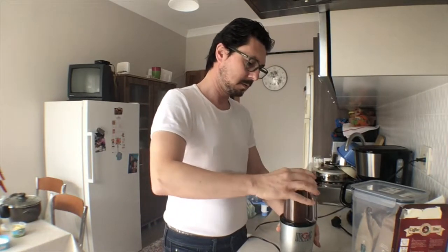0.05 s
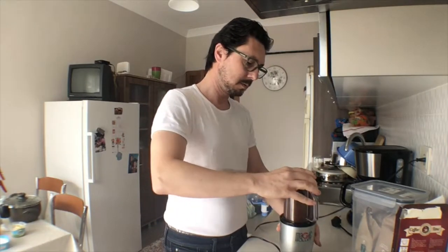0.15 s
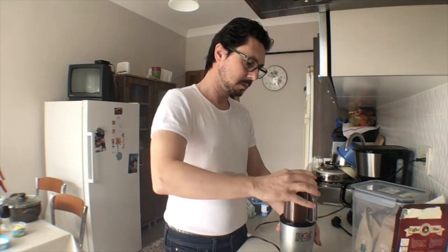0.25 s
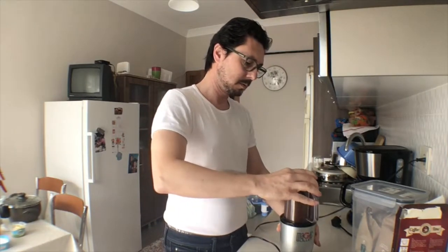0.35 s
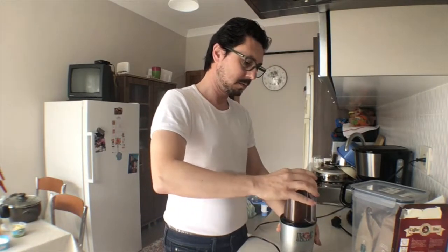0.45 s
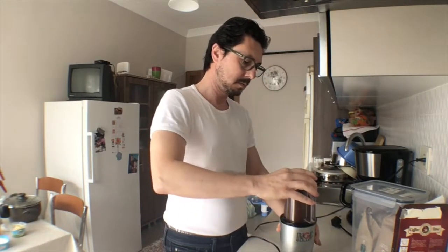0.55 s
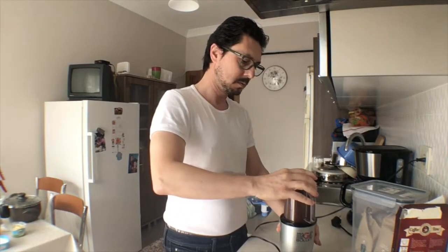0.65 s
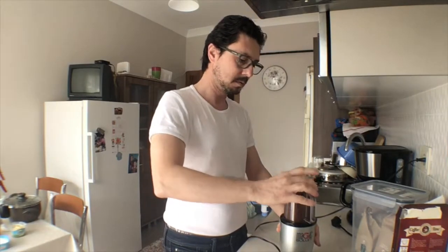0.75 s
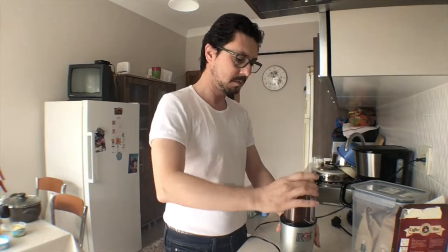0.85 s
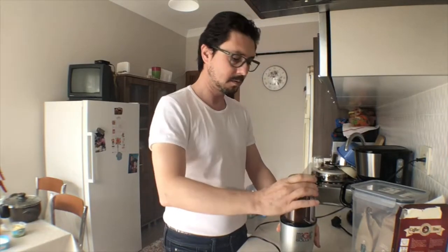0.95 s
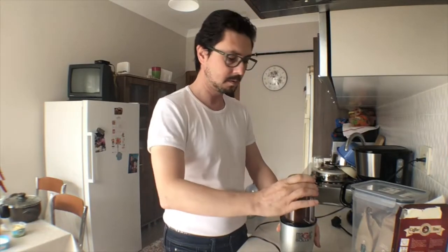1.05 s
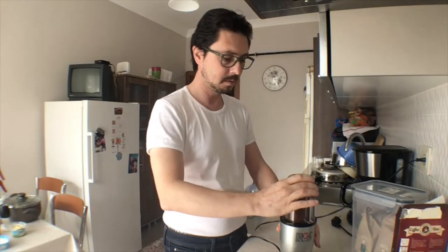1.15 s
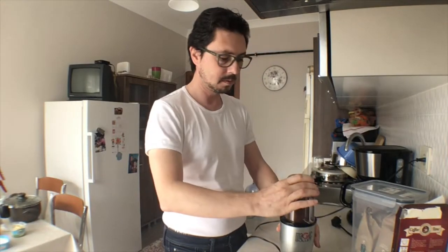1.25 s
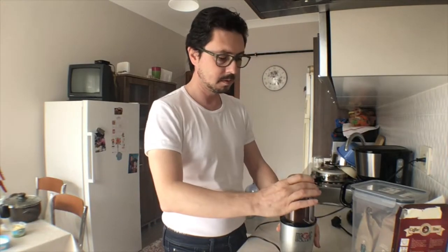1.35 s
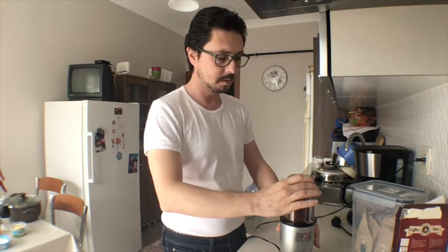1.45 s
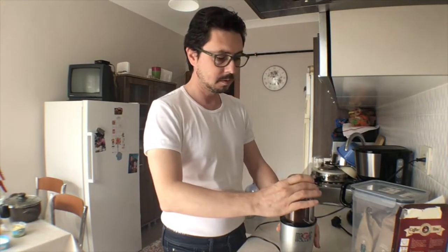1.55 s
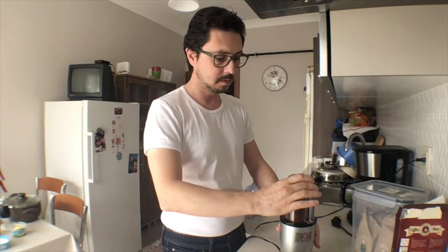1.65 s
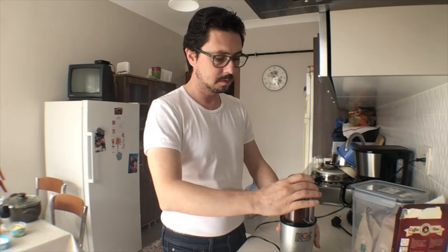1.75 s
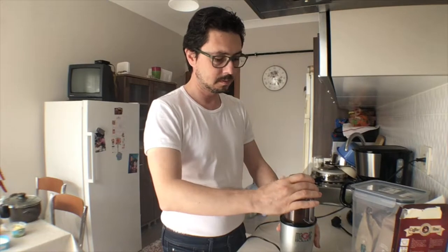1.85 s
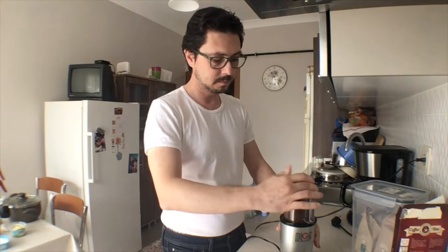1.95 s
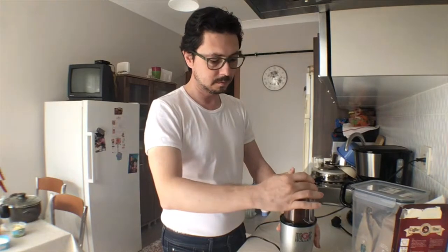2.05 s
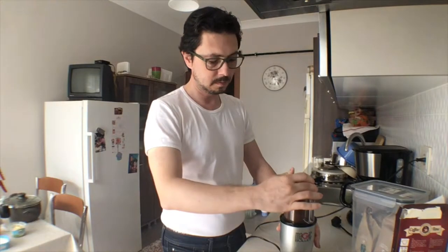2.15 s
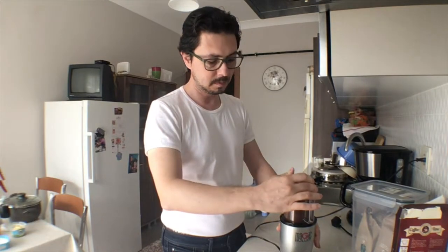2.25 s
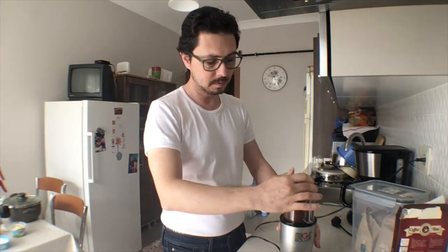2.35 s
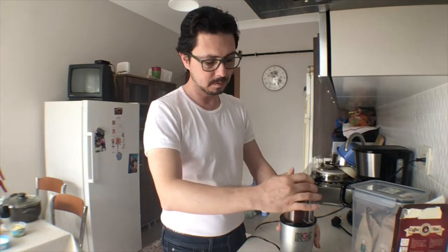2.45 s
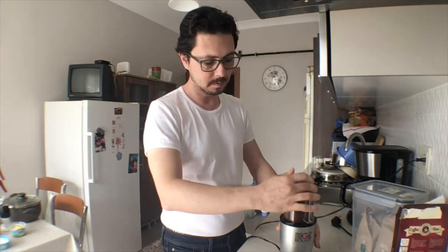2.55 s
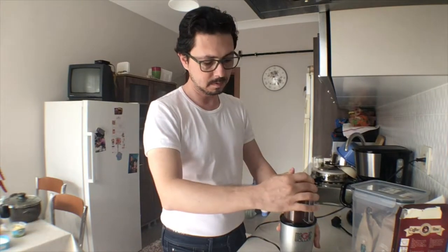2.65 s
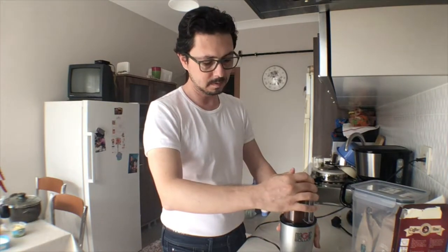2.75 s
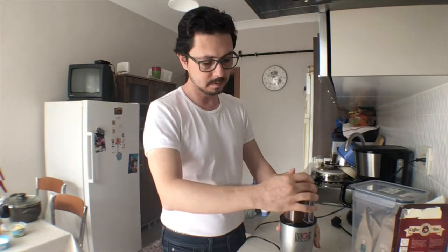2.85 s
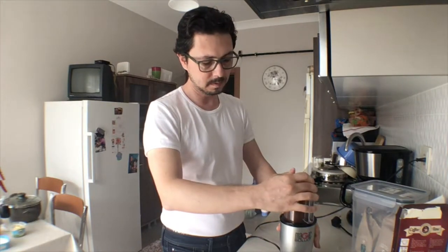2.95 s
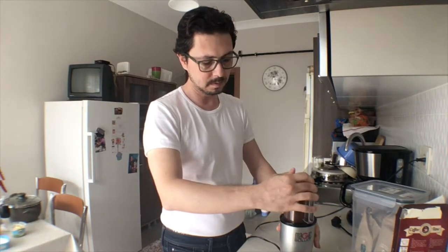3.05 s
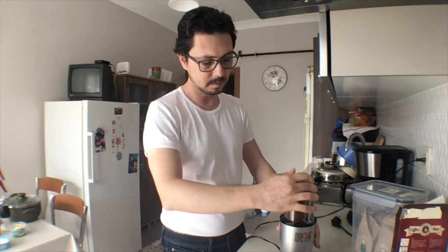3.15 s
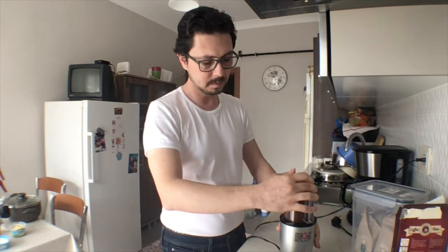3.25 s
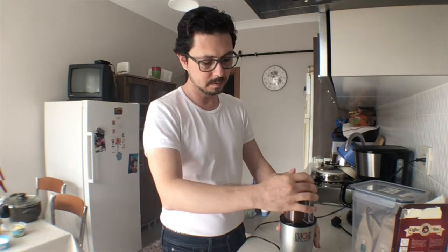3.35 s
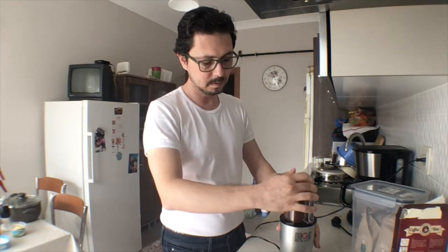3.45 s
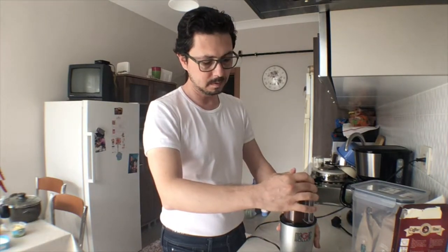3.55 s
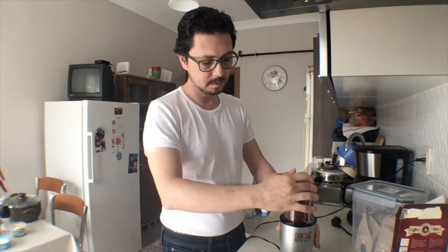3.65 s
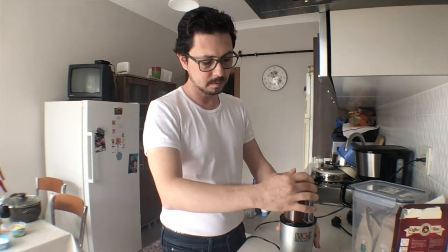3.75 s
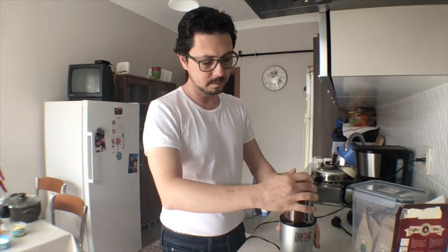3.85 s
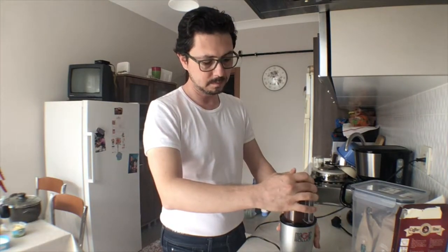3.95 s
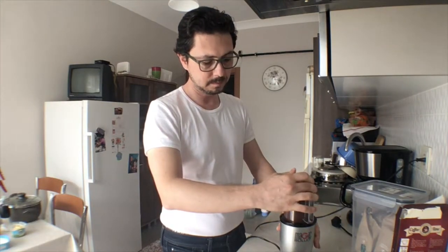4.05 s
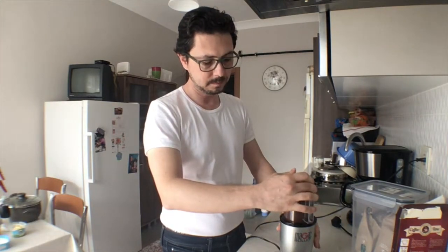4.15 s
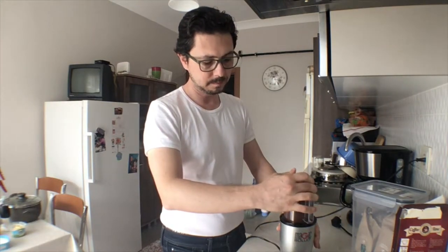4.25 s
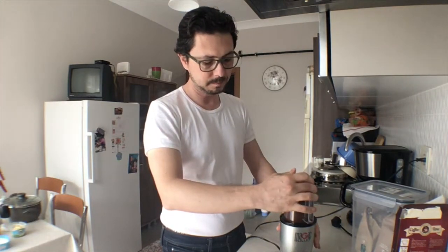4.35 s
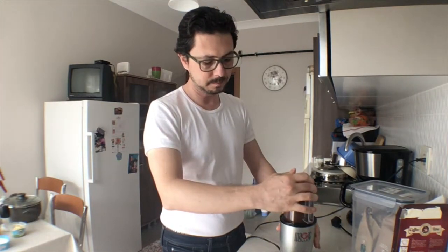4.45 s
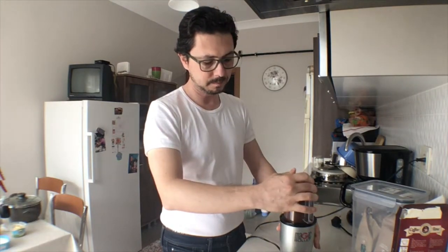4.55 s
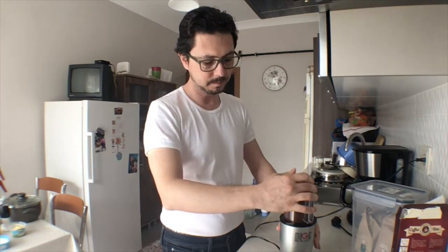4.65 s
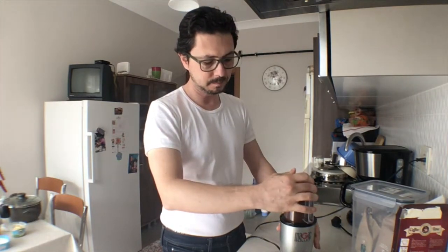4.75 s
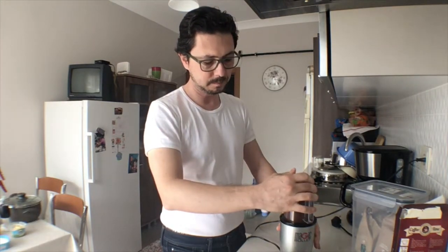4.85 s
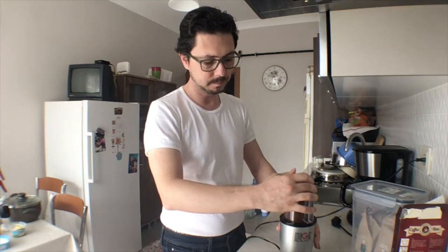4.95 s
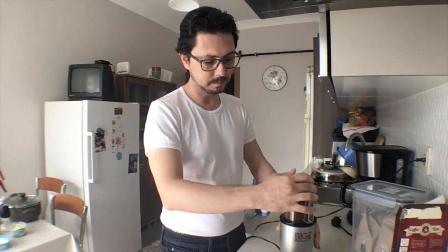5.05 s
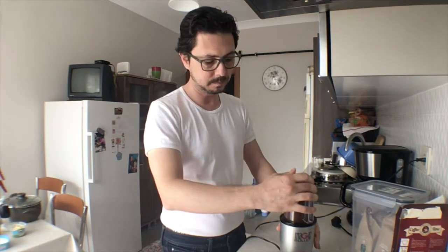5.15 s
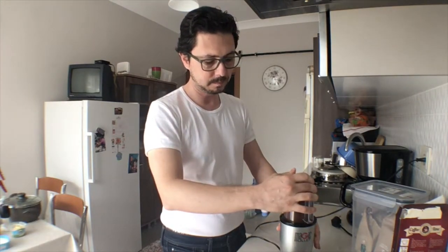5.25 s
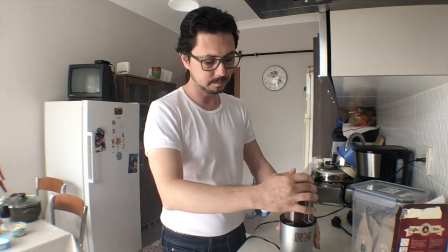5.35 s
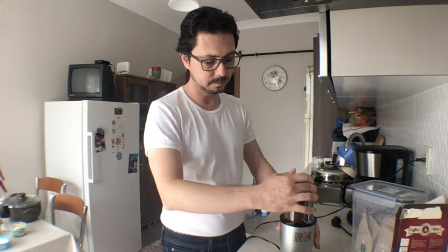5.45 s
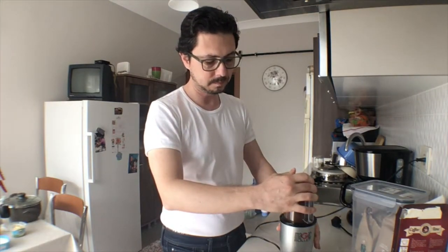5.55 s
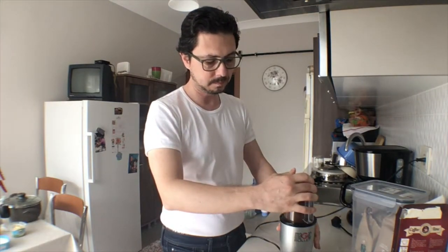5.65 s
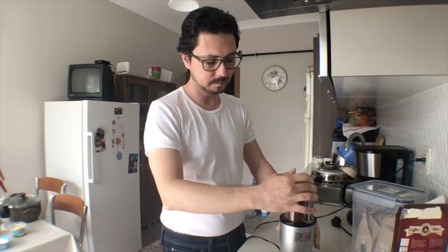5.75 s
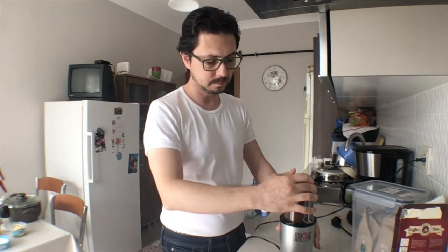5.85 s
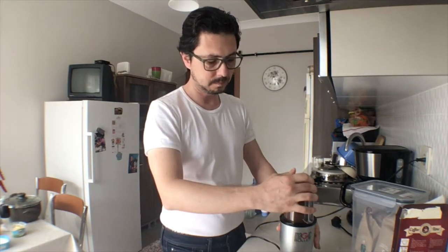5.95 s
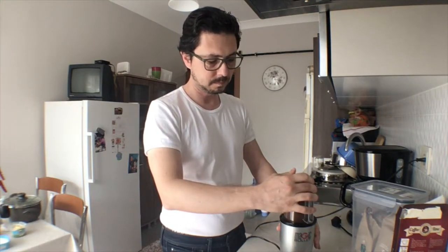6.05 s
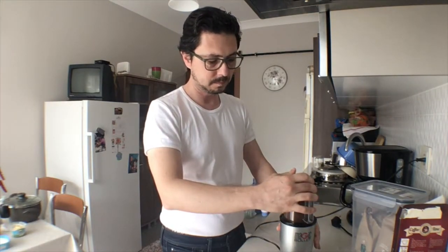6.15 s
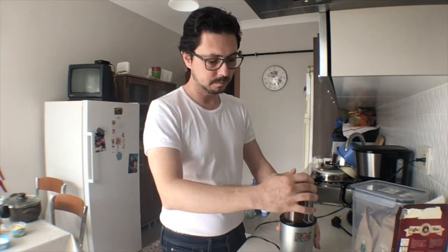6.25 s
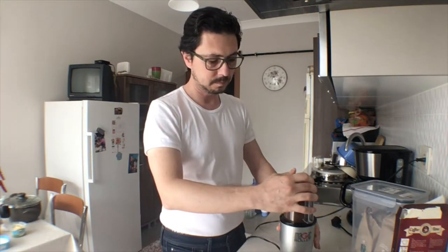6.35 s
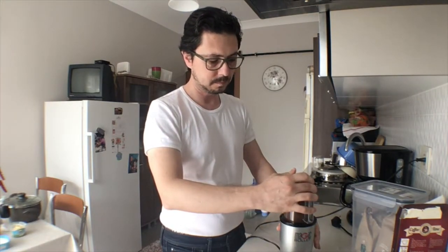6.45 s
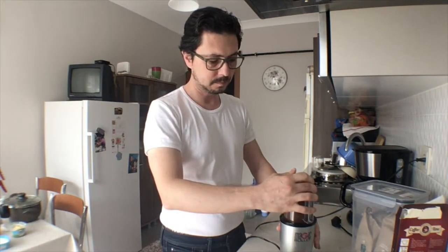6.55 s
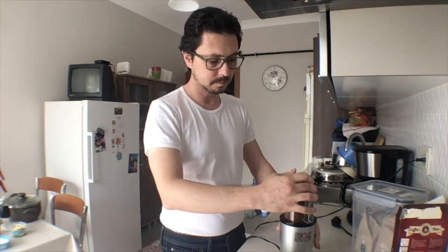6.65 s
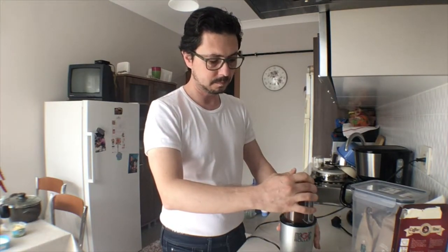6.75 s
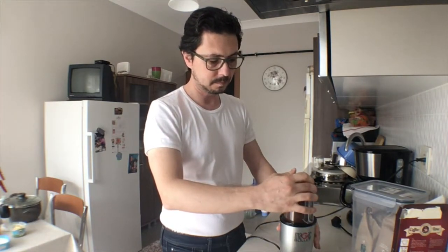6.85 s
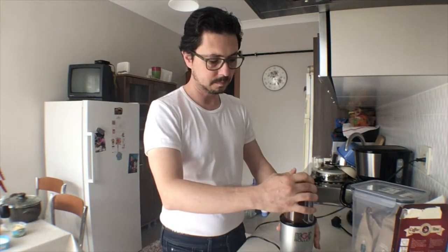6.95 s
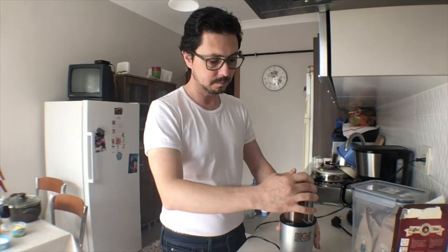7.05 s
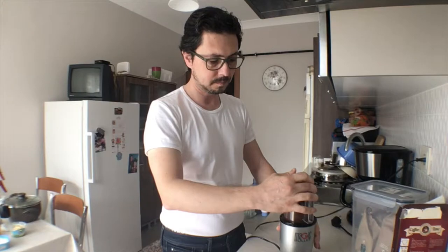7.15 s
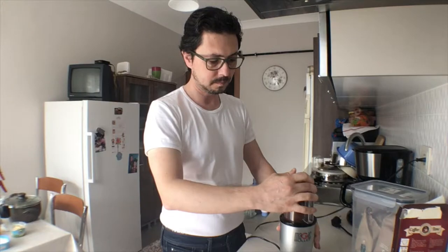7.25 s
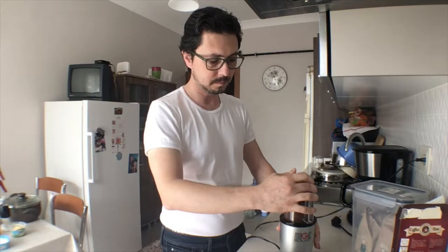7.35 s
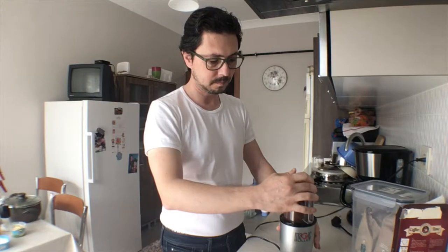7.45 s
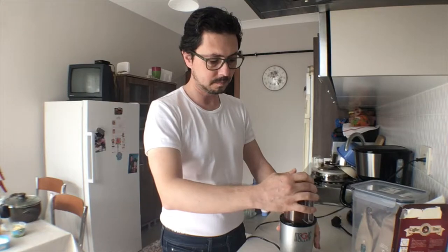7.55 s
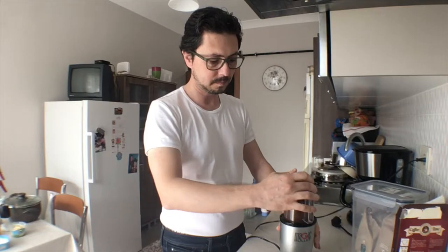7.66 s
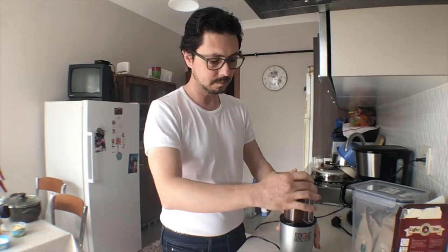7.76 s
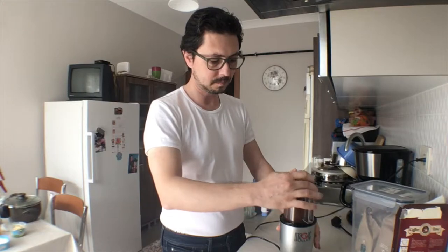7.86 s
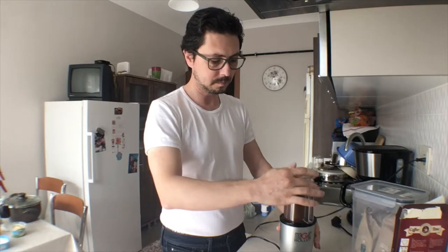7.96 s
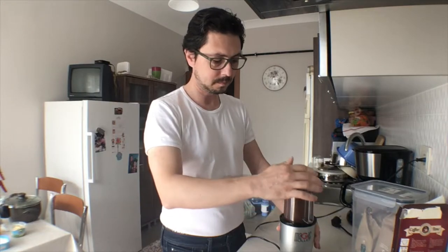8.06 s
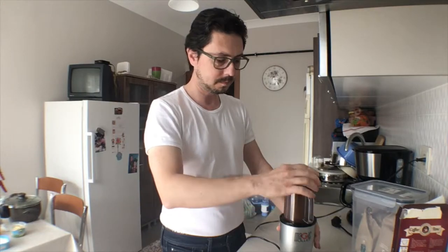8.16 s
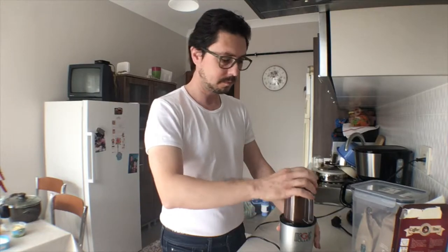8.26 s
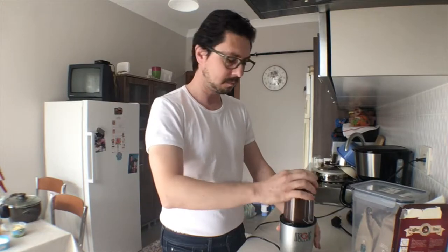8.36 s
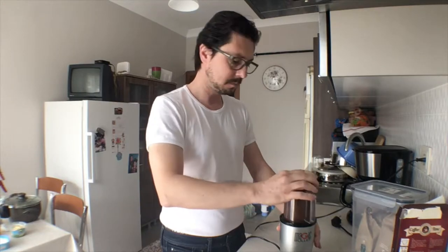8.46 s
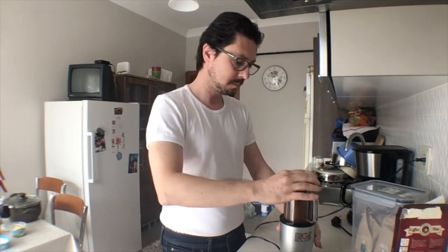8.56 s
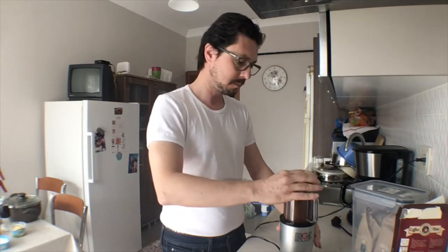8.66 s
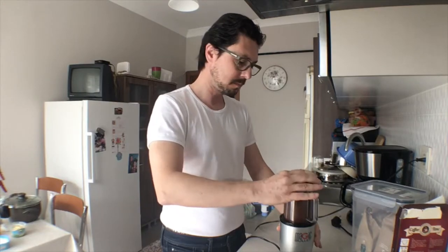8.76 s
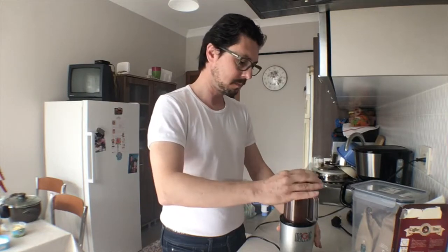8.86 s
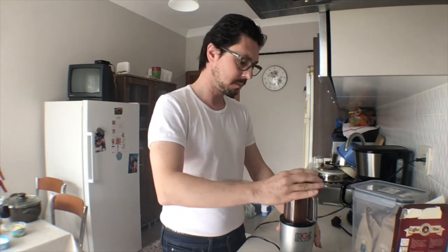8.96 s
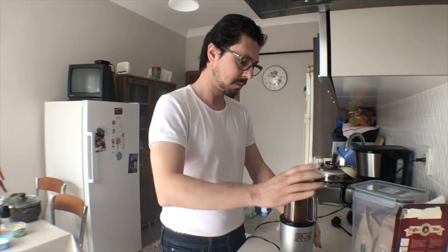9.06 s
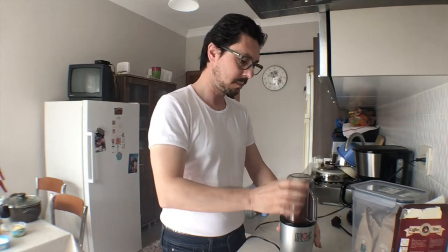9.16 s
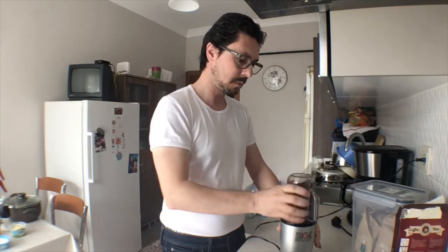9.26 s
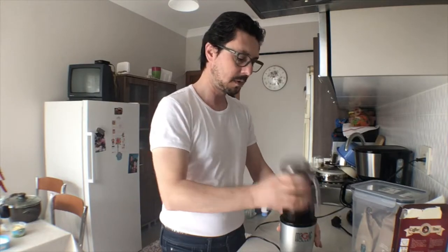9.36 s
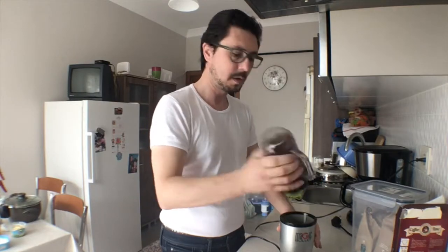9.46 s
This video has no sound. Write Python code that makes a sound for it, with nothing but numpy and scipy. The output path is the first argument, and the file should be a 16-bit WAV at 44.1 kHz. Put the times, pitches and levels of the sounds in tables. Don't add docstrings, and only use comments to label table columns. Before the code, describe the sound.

In a small kitchen, beans settle with a short rattle before a blade grinder kicks in with a thump and rapid spin-up. It grinds steadily for over eight seconds, dense and abrasive, peppered with sharp clumps cracking against the blade and brief ringing streaks from the cup. The noise collapses as the motor stops, then light plastic scrapes and knocks. Heard from a short distance on a phone, mostly dry, with quiet room tone.

```python
import sys
import numpy as np
from scipy import signal
from scipy.fft import rfft, irfft, next_fast_len
from scipy.io import wavfile

SR = 44100
rng = np.random.default_rng(int(sys.argv[2]) if len(sys.argv) > 2 else 0)


def undo_db(level):
    steps = np.asarray(level, float) / 20
    return 10 ** steps


def waveform_to_disk(signal):
    frames = np.transpose(np.atleast_2d(signal))
    scaled = np.clip(frames, -1, 1) * 32767
    samples = np.round(scaled).astype(np.int16)
    wavfile.write(sys.argv[1], SR, samples)


N = 419390

# (time [s], level [dB], fineness [dB])
SETTLE = [(0, -41.5, -3), (.021, -53, -2), (.024, -32, -5), (.044, -29.5, -3), (.07, -42.5, -3),
          (.12, -50, -6), (.27, -85, -6)]
# (time [s], level [dB], fineness [dB])
GRIND = [(.323, -64, 0), (.327, -30.5, -9), (.34, -28.5, -2), (.378, -28, 1), (.40, -28.5, 1),
         (.44, -26.5, 7.5), (.47, -22, 3), (.52, -22.5, 1.5), (.56, -25, 3), (.9, -26, 2), (1.3, -28, 2),
         (2.4, -28, 1), (8.8, -28.5, 0.47), (8.97, -33, 4), (9.03, -38, 2.5), (9.1, -44, 0), (9.2, -60, 1),
         (9.3, -87, .1)]
STEADY_GRIND_DB = -28.5
# (offset [dB], share of fineness [dB/dB], share of level above the steady grind [dB/dB])
BRIGHT_RULE = (.1, 0.98, -.1)
TREBLE_RULE = (-3, 0.96, .2)
THUD_RULE = (1.04, -.1, -0.56)
SPLITS_HZ = [1500, 4500, 8000]
# (frequency [Hz], level [dB per Hz])
CUP_COLOUR = [(80, -50), (200, -45), (290, -9), (480, -14), (530, -21.5), (1000, -8.5), (1650, -9.5),
              (1900, -5.5), (4500, -5), (5850, -8.5), (7400, -5), (9800, -7), (10500, -13), (11200, -6),
              (12600, -9.5), (16000, -15)]
CUP_MODES_HZ = [310, 380, 430, 470, 635, 717, 841, 1050, 1220, 1880, 2070, 2465, 2690, 3010, 3466, 3655,
                4060, 4980, 5160, 5265, 5350, 6150, 6400, 6620, 6860, 7100, 7690]
# (width [Hz], level [dB])
CUP_MODE_SHAPES = [(47.6, -12), (40, -8), (40, -4), (25, -7.5), (40.2, -8), (30, -6), (34, -6.5),
                   (60, -12.5), (66, -6.5), (70, 0.5), (70, -0.5), (60, -0.5), (70, -2.5), (90.5, -5.5),
                   (50, -25.5), (45, -1.5), (70, -4), (90, -7.5), (110, -2), (85, -1), (100, -11),
                   (65, -2.5), (80, -3), (64, -2), (89.3, 0.5), (100, -13.5), (86, -22)]
# (time [s], peak [dB], pitch [Hz], t60 [s])
BIG_CLUMPS = [(1.1663, -14, 2010, .08), (1.533, -17, 2950, 0.12), (1.644, -16.5, 4200, .11),
              (1.882, -14.5, 1890, 0.1), (2.1424, -13.5, 2060, .09), (2.919, -17.5, 1870, .09),
              (2.986, -17, 2470, .09), (3.0454, -14, 2580, .09), (3.1116, -14, 2040, 0.074),
              (3.3227, -17, 2050, .09), (3.4973, -17, 2650, .09), (3.657, -14, 1860, 0.11),
              (3.705, -14, 1850, .09), (4.0855, -16, 2590, .09), (4.5714, -12.5, 3000, 0.069),
              (4.7635, -15.5, 1910, .07), (4.8158, -18, 3460, .11), (4.8887, -18, 1880, .09),
              (4.9944, -17, 2670, .11), (5.4634, -16.5, 2060, 0.18), (5.5676, -10.5, 2450, 0.047),
              (5.9548, -16, 1920, .09), (6.2496, -16.5, 2620, 0.14), (6.4466, -14, 2050, .09),
              (7.128, -13, 2060, .07), (7.2528, -14, 1850, .11), (7.2987, -19, 2580, .09),
              (7.7013, -17, 1910, 0.098), (7.8859, -15, 1850, .09), (8.4905, -12, 3500, .09)]
SMALL_CLUMP_HZ = [1880, 1880, 2070, 2465, 2690, 3010, 3655, 4060]
# (frequency [Hz], level [dB])
CLUMP_COLOUR = [(300, -0.5), (1000, 1.5), (1800, 2), (3000, 0), (5000, 3.5), (9000, -13.5), (15000, -0.5)]
# (time [s], level [dB], pitch [Hz], t60 [s])
SING = [(.36, -38, 2680, 0.35), (.44, -36, 2900, .4), (.68, -39, 6600, .25), (.765, -37, 6600, .3),
        (8.0, -46, 3670, .8), (8.11, -39, 2650, .2), (8.2, -43, 3680, .7), (8.55, -41, 5100, 0.76),
        (8.72, -42, 4900, 0.76)]
# (time [s], peak [dB], pitch [Hz], thud [dB], t60 [s])
TOUCHES = [(.2054, -50, 9500, -76.5, 0.032), (0.2746, -45, 1850, -51, .04), (.289, -55, 2900, -56, 0.022),
           (.3155, -46, 3500, -51, .04), (9.03, -56, 2500, -50, 0.045), (9.145, -57, 2000, -54, 0.069),
           (9.2933, -58, 5000, -70.5, .03), (9.3294, -61, 9000, -72, 0.049), (9.371, -42, 3200, -52, 0.026),
           (9.378, -50, 990, -54, .03), (9.3874, -47, 3450, -61, .05), (9.398, -45, 1870, -65, 0.056),
           (9.4124, -51, 5000, -60, .04), (9.4344, -54, 4000, -65, 0.037), (9.4474, -50, 4480, -61, 0.055),
           (9.4944, -67, 6000, -72, .03)]
# (time [s], speed [turns/s])
ROTOR_SPEED = [(.5, 124), (.56, 136), (.6, 142), (.66, 150), (.72, 155), (.84, 157), (.89, 160), (1.0, 167),
               (1.4, 169), (1.7, 164), (2.1, 159), (2.6, 157), (8.8, 156), (8.92, 153), (9.0, 135)]
# (time [s], level [dB])
BASE_SHAKE = [(.47, 7), (.6, 19), (.84, 17), (.89, -8), (7.6, -7.5), (8.5, 5.5), (8.65, -5), (8.8, 12),
              (9.0, -12)]
# (level on resonance [dB], resonance [Hz], width [Hz], gain at 0 dB shake [dB], flicker [dB])
ROTOR_ORDERS = [
    (-64, 158, 90, -64.5, 0),
    (-47, 341.5, 14.8, -66, 2.5),
    (-53, 470, 13, -64.5, 4),
]
# (frequency [Hz], width [Hz])
COUNTER_MODES = [(70, 17), (100, 22.5)]
# (time [s], lower mode [dB], upper mode [dB], spread [s])
JOLTS = [
    (.08, -53, -51, 0.069),
    (.36, -52, -40.5, 0.038),
    (.48, -40, -49, 0.054),
    (.57, -52, -48, .04),
    (.88, -55, -59, .05),
]
# (frequency [Hz], level [dB per Hz])
AIR_COLOUR = [(100, -15), (300, -7), (500, -8), (905, -17), (1300, -24.5), (3000, -27), (7000, -31),
              (16000, -37)]
# (frequency [Hz], t60 [s])
KITCHEN_T60 = [(100, 0.2), (1000, 0.32), (5000, 0.32), (15000, 0.18)]
# (time [s], low edge [Hz], high edge [Hz], level [dB])
NOISE_PUFFS = [(.749, 5700, 7200, -35), (1.84, 4700, 7200, -33), (2.676, 4200, 5300, -40),
               (2.676, 13800, 15400, -46), (2.906, 4700, 6500, -36), (2.906, 9000, 10600, -44),
               (3.437, 7000, 8400, -39), (3.437, 13800, 15400, -44), (3.815, 12400, 14000, -49),
               (4.789, 5700, 7200, -40), (4.93, 9000, 10600, -46), (6.67, 14600, 15700, -52),
               (7.761, 5200, 6500, -43), (8.063, 9700, 14000, -41), (8.526, 6300, 7800, -39)]


def rms_one(x):
    return x / np.sqrt(np.mean(x ** 2) + 1e-20)


def in_time(spans, silent):
    s, *columns = np.transpose(np.vstack(spans))
    t = np.arange(N) / SR
    return [np.interp(t, s, column, left=quiet, right=quiet) for column, quiet in zip(columns, silent)]


def at_hz(points, hz):
    point_hz, value = np.array(points).T
    return np.interp(np.log(hz + 1), np.log(point_hz), value)


def drift(rate_hz):
    r = np.exp(-80 * np.pi * rate_hz / SR)
    white = rng.standard_normal(N // 40 + 2002)
    slow = signal.lfilter([1], [1, -2 * r, r * r], white)[2000:]
    return np.interp(np.arange(N) / 40, np.arange(len(slow)), rms_one(slow))


def body(spectrum, modes, modes_db, size=16384):
    hz = np.fft.rfftfreq(size, 1 / SR)
    power = undo_db(at_hz(spectrum, hz)) ** 2
    for centre_hz, width_hz, db in modes:
        power = power + undo_db(db + modes_db) ** 2 / (1 + (2 * (hz - centre_hz) / width_hz) ** 2)
    cepstrum = irfft(np.log(power) / 2)
    cepstrum[1:size // 2] *= 2
    cepstrum[size // 2 + 1:] = 0
    response = irfft(np.exp(rfft(cepstrum)))[:size // 2]
    return response / np.sqrt(np.sum(response ** 2))


def through(x, response):
    return signal.fftconvolve(x, response)[:N]


def cut(x, hz, kind):
    return signal.sosfilt(signal.butter(4, hz, kind, fs=SR, output="sos"), x)


def ring(x, hz, width_hz):
    r = np.exp(-np.pi * width_hz / SR)
    gain = (1 - r * r) / 2
    return signal.lfilter([gain, 0, -gain], [1, -2 * r * np.cos(2 * np.pi * hz / SR), r * r], x)


def chips(per_s, spread_db):
    sizes = undo_db(spread_db * np.minimum(rng.exponential(1, N), 5)) * rng.choice([-1, 1], N)
    return rms_one(sizes * (rng.random(N) < per_s / SR))


def swell(t60_s, rise_s, at):
    t = np.arange(min(N - at, round(t60_s * SR))) / SR
    return undo_db(-60 * t / t60_s) * (1 - np.exp(-t / rise_s))


def clatter(s, db, hz, t60_s, per_s, width_hz, tone_db):
    out, cracks = np.zeros(N), chips(per_s, 3.9)
    for at, level_db, centre_hz, decay_s in zip((s * SR).astype(int), db, hz, t60_s):
        shape = swell(decay_s, 0.0012, at)
        end = at + len(shape)
        energy = np.sqrt(np.mean(shape ** 2))
        burst = undo_db(level_db) * rms_one(cracks[at:end] * shape) * energy
        out[at:end] += burst + undo_db(tone_db) * ring(burst, centre_hz, width_hz)
    return out


def hail(cup):
    level_db, fine_db = in_time([SETTLE, GRIND], silent=(-120, 0))
    surge_db = np.maximum(level_db - STEADY_GRIND_DB, 0)
    bright_db, treble_db, thud_db = [offset_db + fine_share * fine_db + surge_share * surge_db
                                     for offset_db, fine_share, surge_share
                                     in (BRIGHT_RULE, TREBLE_RULE, THUD_RULE)]
    gusts = undo_db(0.4 * drift(8.5) + 0.93 * drift(37))
    sound = through(chips(16000, 2.13) * gusts, cup)
    size = next_fast_len(N)
    hz, spectrum = np.fft.rfftfreq(size, 1 / SR), rfft(sound, size)
    below = [irfft(spectrum / (1 + (hz / edge_hz) ** 6), size)[:N] for edge_hz in SPLITS_HZ]
    parts = np.diff([0 * sound, *below, sound], axis=0)
    thud, middle, bright, treble = [part * undo_db(.5 * drift(4.0)) for part in parts]
    mix = middle + undo_db(bright_db) * bright + undo_db(treble_db) * treble + undo_db(thud_db) * thud
    return undo_db(level_db + .5) * mix


def small_clumps():
    count, start_s, gap_s = 170, .4, .05
    when, size, which = rng.random((count, 3)).T
    s = start_s + gap_s * (np.arange(count) + when)
    peak_db = -17 - 8 * size
    hz = np.take(SMALL_CLUMP_HZ, (which * len(SMALL_CLUMP_HZ)).astype(int))
    return s, peak_db, hz, np.full(count, 0.089)


def crunch(cup):
    s, db, hz, t60_s = np.transpose(BIG_CLUMPS)
    big = clatter(s, db - 12.5, hz, t60_s, per_s=5000, width_hz=1200, tone_db=4.0)
    s, db, hz, t60_s = small_clumps()
    small = clatter(s, db - 12.5, hz, t60_s, per_s=4000, width_hz=1040, tone_db=7.0)
    return through(through(big + small, cup), body(CLUMP_COLOUR, [], 0))


def sing():
    s, db, hz, t60_s = np.transpose(SING)
    return clatter(s, db, hz, t60_s, per_s=9000, width_hz=300, tone_db=23.5)


def touches(cup):
    s, db, hz, thud_db, t60_s = np.transpose(TOUCHES)
    rattle = clatter(s, db - 11, hz, t60_s, per_s=7000, width_hz=2500, tone_db=6)
    envelope = np.zeros(N)
    for start_s, level, decay_s in zip(s, undo_db(thud_db + 6.5), 1.56 * t60_s):
        at = round(start_s * SR)
        shape = swell(decay_s, 0.0017, at)
        envelope[at:at + len(shape)] += level * shape
    knock = envelope * rng.standard_normal(N)
    hollow = undo_db(17) * ring(knock, 320, 140) + undo_db(7.5) * ring(knock, 720, 350)
    hollow = hollow + undo_db(1.0) * ring(knock, 1200, 200)
    return through(rattle, cup) + hollow


def rotor():
    turns_per_s, = in_time([ROTOR_SPEED], silent=(120,))
    shake_db, = in_time([BASE_SHAKE], silent=(-120,))
    phase = 2 * np.pi * np.cumsum(turns_per_s * (1 + .006 * drift(8))) / SR
    running = shake_db > -100
    out = 0
    for k, (db, hz, width_hz, loose_db, flicker_db) in enumerate(ROTOR_ORDERS, 1):
        resonance = 1 / (1 + ((k * turns_per_s - hz) / width_hz) ** 2)
        held = undo_db(db + flicker_db * drift(16)) * resonance * running
        out = out + np.sqrt(2) * (held + undo_db(loose_db + shake_db)) * np.sin(k * phase)
    return out


def rumble():
    t = np.arange(N) / SR
    out = 0
    for k, (steady_db, (hz, width_hz)) in enumerate(zip((-62, -61), COUNTER_MODES)):
        level = undo_db(steady_db + 2.5 * drift(3.4))
        for jolt in JOLTS:
            level = level + undo_db(jolt[k + 1]) * np.exp(-((t - jolt[0]) / jolt[3]) ** 2)
        mode = ring(ring(rng.standard_normal(N), hz, 3.1 * width_hz), hz, width_hz)
        out = out + level * rms_one(mode)
    return out


def kitchen(x):
    t = np.arange(SR // 2) / SR
    tail, white = 0, rng.standard_normal(len(t))
    for low_hz in 62.5 * 2. ** np.arange(8):
        octave = signal.butter(2, [low_hz, 2 * low_hz], "band", fs=SR, output="sos")
        tail = tail + signal.sosfilt(octave, white) * undo_db(-60 * t / at_hz(KITCHEN_T60, 1.4 * low_hz))
    tail = tail * np.clip((t - .004) / 0.0036, 0, 1)
    return through(x, tail / np.sqrt(np.sum(tail ** 2)))


def fridge():
    return undo_db(-80) * rms_one(ring(ring(rng.standard_normal(N), 905, 8), 905, 8))


def air():
    return undo_db(-69) * through(rng.standard_normal(N), body(AIR_COLOUR, [], 0))


def noise_puffs():
    out, size = np.zeros(N), 2048
    hz = np.fft.rfftfreq(size, 1 / SR)
    for s, low_hz, high_hz, db in NOISE_PUFFS:
        spectrum = rfft(rng.standard_normal(size))
        band = rms_one(irfft(spectrum * (hz > low_hz) * (hz < high_hz)))
        at = round(s * SR) - size // 2
        out[at:at + size] += undo_db(db) * band * np.hanning(size) ** 2
    return out * [[1], [-1]]


def camera_tick():
    tick = np.zeros(N)
    tick[((np.arange(570) / 60 + .0115) * SR).astype(int)] = undo_db(-57)
    return cut(tick, 4000, "high")


def scene():
    modes = [(hz, *shape) for hz, shape in zip(CUP_MODES_HZ, CUP_MODE_SHAPES)]
    cup = body(CUP_COLOUR, modes, modes_db=1.5)
    grinder = hail(cup) + crunch(cup) + sing() + touches(cup)
    mono = grinder + undo_db(-10) * kitchen(grinder) + rotor() + rumble() + fridge() + air()
    return np.array([mono, mono])


def band_limit(x):
    return signal.sosfilt(signal.butter(12, 16150, fs=SR, output="sos"), x)


def record(dry):
    x = cut(dry, 52, "high") + camera_tick() + noise_puffs()
    top_cut = signal.ellip(12, .5, 70, 15720, fs=SR, output="sos")
    mix = signal.sosfilt(top_cut, x)
    return band_limit(mix)


dry = scene()
out = record(dry)
waveform_to_disk(out)
```